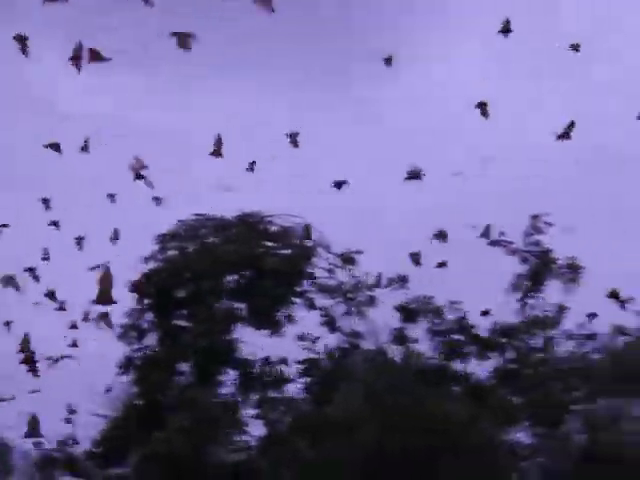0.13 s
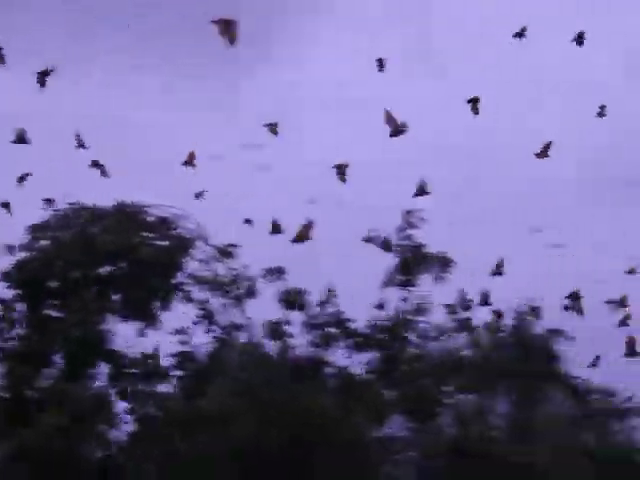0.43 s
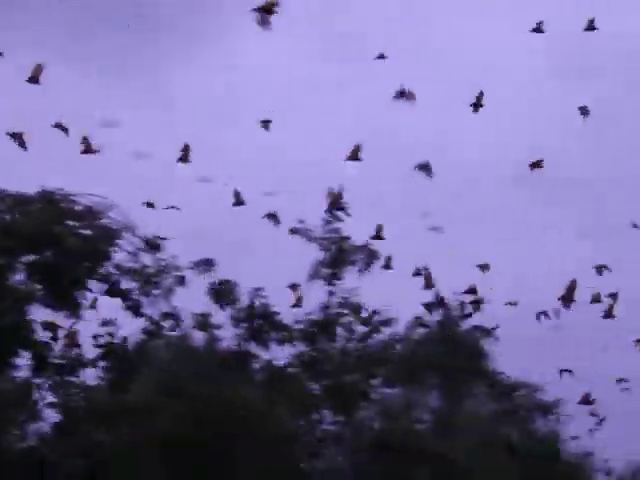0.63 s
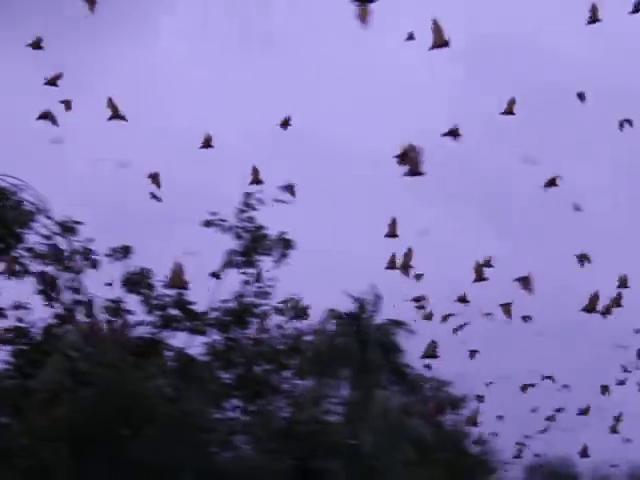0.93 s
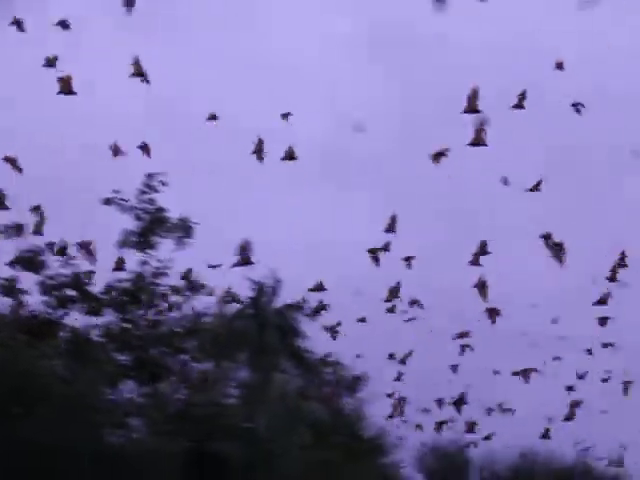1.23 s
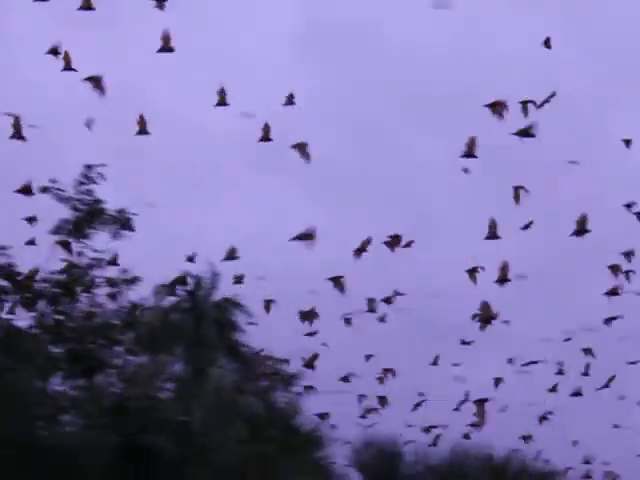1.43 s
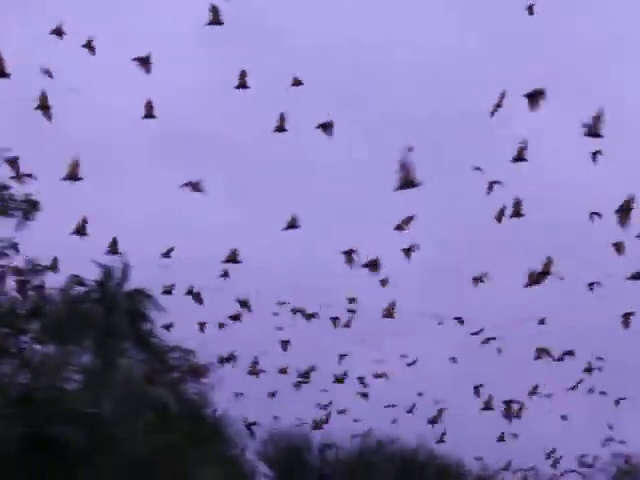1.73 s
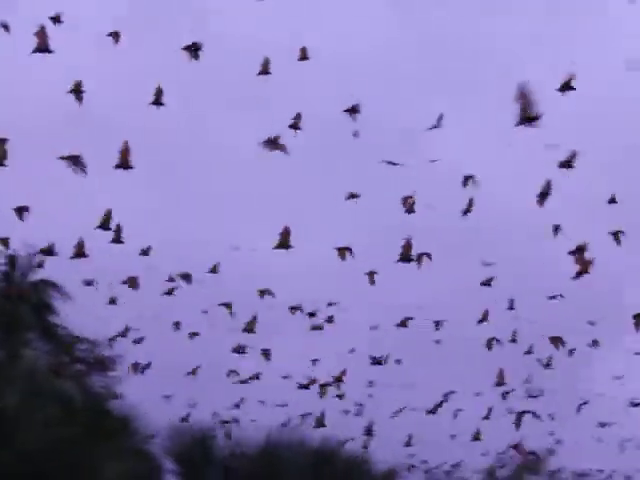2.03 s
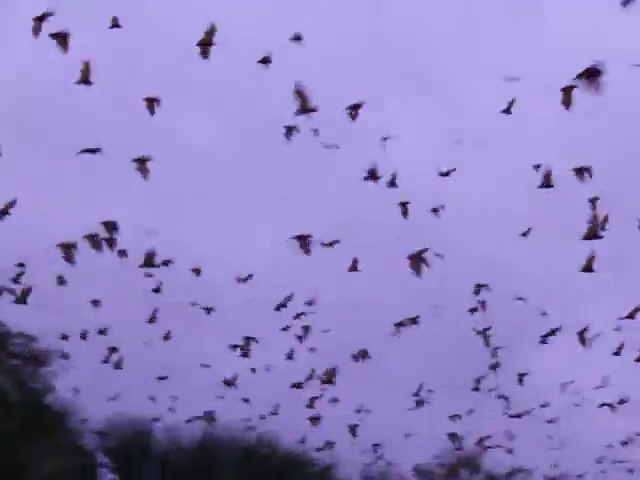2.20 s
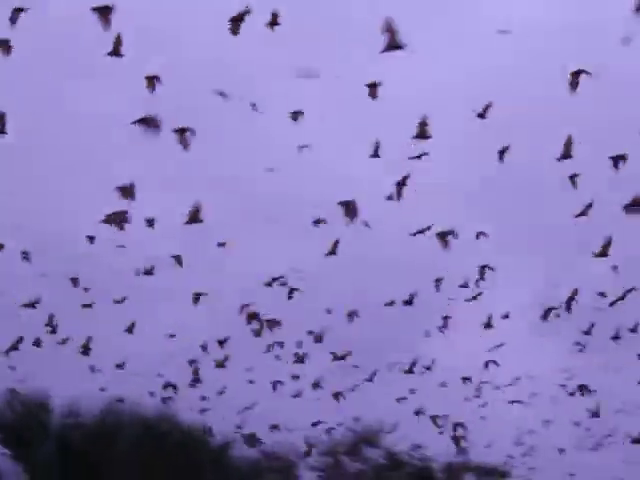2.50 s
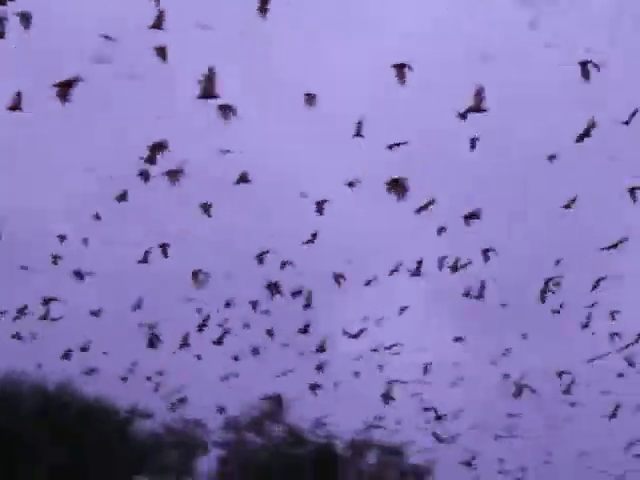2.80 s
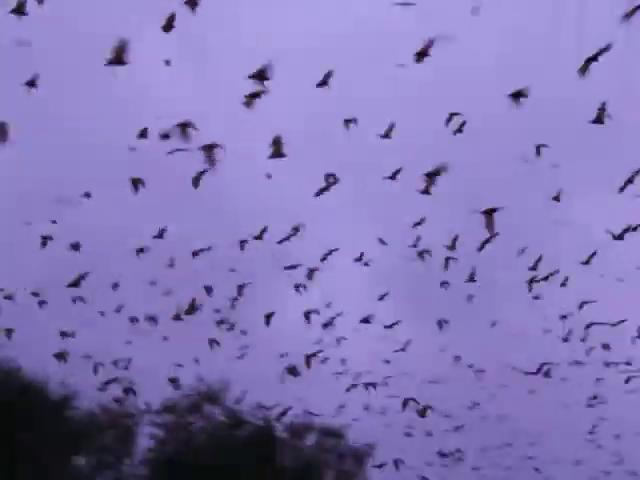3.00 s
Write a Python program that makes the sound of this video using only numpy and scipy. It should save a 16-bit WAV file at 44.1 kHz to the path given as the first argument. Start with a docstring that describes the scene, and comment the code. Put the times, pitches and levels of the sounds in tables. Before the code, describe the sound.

A large bat colony chatters throughout, a shrill distant wash over low outdoor noise. From about 0.1 to 0.3 seconds one bat screeches loudly and harshly close by, with soft bumps of air on the microphone; the level dips briefly and recovers. Short rasps and squeaks follow until the end at around 3 seconds, echoing lightly in the trees. A thin, trembling squeal rises at about 2.4 to 2.6 seconds.

```python
"""Flying foxes at dusk

Thousands of distant voices merge into a shrill wash, and single rasps and squeals stand out,
echoing in the trees. The rasps are rough larynx pulses through gliding resonances, the squeals
narrow resonances or trembling tones. One bat screeches close by and the gain control ducks,
then recovers. Light air bumps the single microphone over a low outdoor bed."""
import sys
import numpy as np
from scipy import signal
from scipy.io import wavfile
from scipy.ndimage import uniform_filter1d

SR = 44100
rng = np.random.default_rng(int(sys.argv[2]) if len(sys.argv) > 2 else 0)


def wrap_up_sound(samples):
    """Save the sound to the file named by the first command line argument, as 16-bit audio."""
    columns = np.atleast_2d(samples).T
    # keep every value between -1 and 1, then stretch to whole-number steps
    tamed = np.clip(columns, -1, 1)
    steps = np.round(tamed * 32767).astype(np.int16)
    wavfile.write(sys.argv[1], SR, steps)


N = 138915
TIME = np.arange(N) / SR

# The arc of the close screech. Each row: time in seconds, pitch in Hz, tone level in dB, rasp level
# in dB, upper resonance in Hz, its level in dB, level of the top edges in dB.
SCREECH_ARC = [(.100, 2116, -52, -44, 3870, -34, -46), (.116, 2190, -20.5, -36, 3870, -24, -42),
               (.130, 2350, -15.5, -22, 3950, -28, -39.5), (.150, 2484, -18.5, -34, 4150, -24, -42),
               (.170, 2550, -18, -24, 4530, -23, -41), (.195, 2630, -19.5, -26, 4260, -18, -39),
               (.217, 2660, -15.5, -27, 4500, -15, -44), (.240, 2800, -16.5, -14.5, 4150, -14, -43),
               (.256, 2930, -13, -27, 3800, -14, -39), (.278, 2840, -11.5, -16, 4000, -18, -41),
               (.288, 2740, -16, -21, 4140, -17, -39), (.310, 2694, -11.5, -15, 4230, -16, -32.5),
               (.324, 2564, -15.5, -21, 4270, -22, -36), (.340, 2650, -26, -42, 4300, -45, -47)]
# Thin top edges that ride on the pitch. Each row: offset above it in Hz, width in Hz, trim in dB.
TOP_EDGES = [(4650, 1500, 0.5), (5750, 880, 0.5), (8400, 1200, -12)]


def screech(pulse_hz=613, wander_hz=55, lurch_db=0.5, edge_flicker_db=2.5, crest_db=-14.5):
    """A ragged arching tone that breaks into a rasp, with a broad upper resonance and thin top edges."""
    main_hz, tone_db, rasp_db, upper_hz, upper_db, edge_db = in_time(SCREECH_ARC)
    voice = larynx(pulse_hz, rough=1, size=N)
    tone = rough_tone(main_hz + wander_hz * drift(92, N), jitter=0.0247, flutter_db=2.8, rate_hz=268)
    rasp = resonance(voice, main_hz + 44, width_hz=1100)  # hoarse spread around the tone
    crest = from_db(crest_db) * resonance(voice, upper_hz, width_hz=200)
    upper = resonance(voice, upper_hz, width_hz=1180) + crest
    edges = 0
    for above_hz, width_hz, db in TOP_EDGES:
        flicker = from_db(db + edge_flicker_db * drift(45, N))
        edges += flicker * resonance(voice, main_hz + above_hz, width_hz)
    effort = during(SCREECH_ARC) * from_db(lurch_db * drift(59, N))
    body = from_db(tone_db) * tone + from_db(rasp_db) * rasp
    return effort * (body + from_db(upper_db) * upper + from_db(edge_db) * edges)


# One drawn-out rising squeal. Each row: time in seconds, pitch in Hz, level in dB.
SQUEAL_RISE = [(2.37, 2100, -48), (2.398, 2095, -33), (2.44, 2125, -32.5), (2.49, 2205, -32),
               (2.529, 2300, -25.5), (2.541, 2310, -39), (2.556, 2335, -22), (2.595, 2335, -26),
               (2.615, 2340, -45)]


def squeal():
    """One bat holds a nearly pure, trembling tone."""
    hz, db = in_time(SQUEAL_RISE)
    return during(SQUEAL_RISE) * from_db(db) * rough_tone(hz, jitter=0.0057, flutter_db=3.3, rate_hz=110)


# Calls from the nearer trees; wide ones rasp, narrow ones squeak. Each row: start in seconds, length
# in seconds, opening resonance in Hz, closing resonance in Hz, arch in Hz, width in Hz, level in dB.
NEAR_CALLS = [(-.03, .15, 4050, 3770, 0, 970, -26.5), (.0, 0.071, 2390, 2400, 0, 500, -31.5),
              (.074, .022, 3640, 3630, 4, 120, -19), (.34, .12, 2710, 2720, 0, 303, -48),
              (.64, .10, 2800, 2520, 0, 450, -29.5), (.80, 0.27, 4060, 3710, -4, 700, -27),
              (.92, .14, 4770, 4530, 18, 900, -34), (1.07, 0.045, 1483, 1500, 16, 70, -37),
              (1.17, 0.087, 2566, 2670, -3, 130, -29.5), (1.19, 0.17, 3200, 3150, -2, 830, -31),
              (1.355, 0.096, 2490, 2090, -5, 400, -28.5), (1.45, .12, 3350, 3220, -4, 1520, -32.5),
              (1.51, .05, 3280, 3240, -6, 70, -29.5), (1.52, 0.13, 4140, 3260, 98, 220, -32),
              (1.715, .08, 5240, 4800, 300, 252, -37.5), (1.81, .05, 5520, 4470, -150, 248, -36),
              (1.73, 0.039, 2370, 2330, 0, 130, -29.5), (1.73, .05, 2850, 2880, 8, 130, -28),
              (1.87, .125, 3640, 3750, -230, 101, -33), (1.99, .07, 3100, 2830, 0, 606, -32),
              (2.09, .06, 2800, 2750, 0, 100, -37), (2.19, .09, 3020, 2900, 40, 330, -30.5),
              (2.22, 0.15, 4680, 4800, 0, 600, -36), (2.42, .125, 2780, 3020, -60, 129, -33),
              (2.525, .04, 3000, 3500, 0, 700, -28), (2.655, .05, 3220, 3170, 0, 90, -36),
              (2.72, .13, 3250, 3170, 0, 220, -35.5), (2.87, 0.18, 2710, 2670, 0, 594, -33),
              (2.94, 0.11, 3400, 3500, 0, 900, -31), (2.96, 0.075, 4500, 4550, 0, 800, -29.5)]


def calls(rows, attack_s=0.011, release_s=0.03, pulse_hz=433.4):
    """Each call is a rough voice through one gliding resonance, with attack, hold and release."""
    out = np.zeros(N)
    for start, length, start_hz, end_hz, arch_hz, width_hz, db in rows:
        t = np.arange(int(max(length, .02) * SR)) / SR
        hz = np.linspace(start_hz, end_hz, len(t)) + arch_hz * np.sin(np.pi * t / t[-1])
        buzz = larynx(pulse_hz * rng.uniform(.7, 1.4), rough=0.5, size=len(t))
        voice = resonance(buzz, hz, width_hz)
        envelope = np.minimum(t / attack_s, 1) * np.minimum((t[-1] - t) / release_s, 1)
        at = int(start * SR) + np.arange(len(t))
        inside = (at >= 0) & (at < N)
        out[at[inside]] += (from_db(db) * envelope * voice)[inside]
    return out


def chatter(per_second=24, low_hz=2437, high_hz=4630):
    """Short gliding squabbles from farther off in the roost, scattered at random."""
    rows = []
    for when, long, pitch, glide, wide, loud in rng.uniform(-1, 1, (int(per_second * N / SR), 6)):
        start, length = (when + 1) / 2 * N / SR, .06 * 2 ** long
        start_hz = low_hz * (high_hz / low_hz) ** ((pitch + 1) / 2)
        end_hz = start_hz * (1 + 0.11 * glide)
        width_hz, db = 244 * 2 ** wide, -40.5 + 4 * loud
        rows.append((start, length, start_hz, end_hz, 0, width_hz, db))
    return calls(rows)


# The colour of the distant colony. Each row: frequency in Hz, relative noise density in dB.
COLONY_SPECTRUM = [(900, -39), (1150, -17), (1400, -9.5), (1850, -10), (2350, -2.5), (2850, 0),
                   (3900, -2.5), (4800, -5), (5500, -9.5), (6500, -20), (8200, -21), (10500, -26),
                   (15500, -32.5)]
# The colony's vigour, rising and falling. Each row: time in seconds, level in dB.
COLONY_VIGOUR = [(0, -31), (.3, -24), (.5, -29.5), (.75, -26.5), (1.05, -28.5), (1.3, -27.5), (1.55, -26.5),
                 (1.85, -29.5), (2.0, -27), (2.12, -29.5), (2.3, -29), (2.65, -29.5), (2.96, -26.5),
                 (3.15, -30.5)]


def colony():
    """The farthest voices merge into a flickering wash."""
    db, = in_time(COLONY_VIGOUR)
    return from_db(db) * banded_noise(COLONY_SPECTRUM, patchy_db=1.42, flicker_hz=13)


# Soft bumps of air. Each row: peak time in seconds, half-length in seconds, level in dB.
AIR_PUFFS = [(.052, 0.017, -34), (.082, 0.012, -34), (.112, 0.0089, -30), (.305, 0.033, -34.5),
             (.95, 0.041, -43), (1.38, 0.099, -55)]


def puffs():
    """Light air hits the microphone with low thuds."""
    return swells(AIR_PUFFS, hz=108, width_hz=124)


# Touches of high hiss. Each row: peak time in seconds, half-length in seconds, level in dB.
TREBLE_RUSTLES = [(.12, 0.6, -46.5), (.93, 0.4, -48.5), (1.98, .05, -57), (2.28, 0.063, -48),
                  (2.953, .005, -40)]


def rustles():
    """Faint rustles come and go in the treble."""
    return swells(TREBLE_RUSTLES, hz=10200, width_hz=10600)


# The colour of the outdoor bed. Each row: frequency in Hz, relative noise density in dB.
AIR_SPECTRUM = [(25, -10), (50, -14), (90, -1), (170, -1), (300, -1), (450, -3.5), (1000, -6.5), (2000, -9),
                (4000, -22)]


def outdoor_air(level_db=-38.5):
    """A low, gently wavering bed of noise under the bats."""
    return from_db(level_db) * banded_noise(AIR_SPECTRUM, patchy_db=1.0, flicker_hz=9.2)


def canopy_echoes(x, t60_s=0.67):
    """The trees scatter sound back: ten feedback delays, together as loud as the input."""
    out = np.zeros(N)
    for k, lag in enumerate((np.geomspace(.021, .083, 10) * SR).astype(int)):
        loop, feedback = x.copy(), from_db(-60 * lag / SR / t60_s)
        for i in range(lag, N, lag):
            loop[i:i + lag] += feedback * loop[i - lag:i][:N - i]
        out += (loop - x) * (-1) ** k
    return unit_rms(out) * np.std(x)


def larynx(pulse_hz, rough, size, jitter=.18):
    """Uneven pulses mixed with hiss gated in every cycle; rough is the hiss's share of the power."""
    cycles = np.cumsum(pulse_hz * np.exp(jitter * drift(60, size))) / SR
    pulses = np.diff(np.floor(cycles), prepend=0)
    hiss = rng.standard_normal(size) * np.exp(-2 * (cycles % 1))
    return np.sqrt(1 - rough) * unit_rms(pulses) + np.sqrt(rough) * unit_rms(hiss)


def rough_tone(hz, jitter, flutter_db, rate_hz):
    """A shrill tone that trembles in pitch and level; rms 1."""
    phase = 2 * np.pi * np.cumsum(hz * (1 + jitter * drift(rate_hz, N))) / SR
    return unit_rms(from_db(flutter_db * drift(rate_hz, N)) * np.sin(phase))


def resonance(source, hz, width_hz, even=0.61):
    """A movable resonance with steep skirts, its level partly evened out; rms 1."""
    carrier = np.exp(2j * np.pi * np.cumsum(hz * np.ones(len(source))) / SR)
    lowpass = signal.butter(3, min(width_hz / 2, SR / 4), fs=SR, output="sos")
    ring = signal.sosfilt(lowpass, source / carrier)  # the band, shifted down to 0 Hz
    power = uniform_filter1d(np.abs(ring) ** 2, size=300)
    return unit_rms((ring * carrier).real / (np.abs(power) + 1e-9) ** (even / 2))


def swells(rows, hz, width_hz):
    """Rounded bursts of noise in one band."""
    envelope = sum(from_db(db) * np.exp(-2 * ((TIME - peak) / half) ** 2) for peak, half, db in rows)
    return envelope * resonance(rng.standard_normal(N), hz, width_hz, even=0.59)


def banded_noise(spectrum, patchy_db, flicker_hz):
    """Eighteen bands of noise, each wavering in level; rms 1."""
    hz, db = np.transpose(spectrum)
    edges = np.geomspace(hz[0], min(hz[-1], SR * .45), 19)
    out, white = 0, rng.standard_normal((2, N))
    for k, (low, high) in enumerate(zip(edges, edges[1:])):
        band = signal.sosfilt(signal.butter(2, [low, high], "band", fs=SR, output="sos"), white[k % 2])
        band_db = np.interp(np.log(low * high) / 2, np.log(hz), db)
        out += band * from_db(band_db + patchy_db * drift(flicker_hz, N))
    return unit_rms(out)


def drift(rate_hz, size, hop=40):
    """Smooth random movement of spread 1."""
    pole = np.exp(-2 * np.pi * rate_hz * hop / SR)
    white = rng.standard_normal(size // hop + 2002)
    slow = signal.lfilter([1], [1, -2 * pole, pole * pole], white)[2000:]  # once the filter has settled
    return np.interp(np.arange(size) / hop, np.arange(len(slow)), unit_rms(slow))


def in_time(rows):
    """Each column of a curve, at every sample."""
    times, *columns = np.transpose(rows)
    return [np.interp(TIME, times, column) for column in columns]


def during(rows, fade_s=.004):
    """A gate that is open while a curve lasts."""
    return np.clip(np.minimum(TIME - rows[0][0], rows[-1][0] - TIME) / fade_s, 0, 1)


def from_db(db):
    """Decibels to gain."""
    return 10 ** (np.asarray(db) / 20)


def unit_rms(x):
    """Scale to rms 1."""
    return x / np.sqrt(np.mean(x ** 2) + 1e-20)


def scene(roost_send_db=-6.5, close_send_db=-16):
    """Far and near bats among the trees, over the background; both channels alike."""
    background = colony() + outdoor_air() + puffs() + rustles()
    close = screech()
    roost = squeal() + calls(NEAR_CALLS) + chatter()
    echoes = canopy_echoes(from_db(roost_send_db) * roost + from_db(close_send_db) * close)
    mono = close + roost + echoes + background
    return np.array([mono, mono])


def gain_control(x, threshold_db=-21.5, attack_s=0.073, release_s=.33):
    """A gain that ducks quickly while the level is over the threshold and comes back slowly."""
    step, cut_db, cuts = SR // 200, 0, []
    power = np.abs(uniform_filter1d(x ** 2, size=512))[::step]
    level_db = 10 * np.log10(power + 1e-12)
    for over_db in np.maximum(level_db - threshold_db, 0):
        lag_s = attack_s if over_db > cut_db else release_s
        cut_db += (over_db - cut_db) * (1 - np.exp(-step / SR / lag_s))
        cuts.append(cut_db)
    return from_db(-np.interp(TIME, TIME[::step], cuts))


def record(dry, cutoff_hz=15800):
    """Gain control, then a steep cut of the very top."""
    lowpass = signal.ellip(12, .1, 80, cutoff_hz, fs=SR, output="sos")
    return signal.sosfilt(lowpass, dry * gain_control(dry[0]))


dry = scene()
out = record(dry)
wrap_up_sound(out)
```